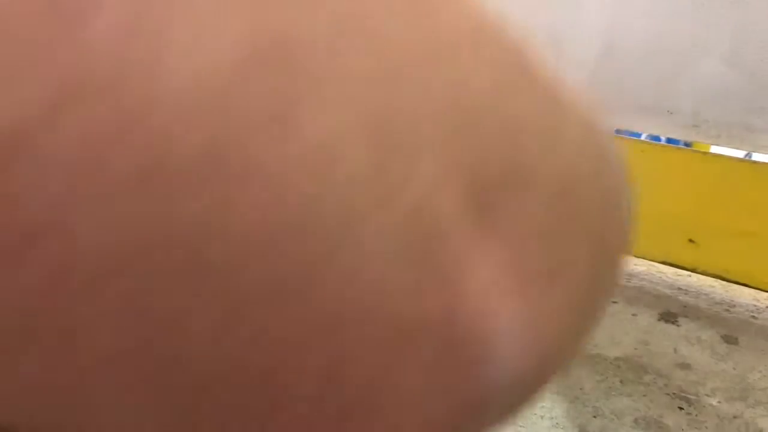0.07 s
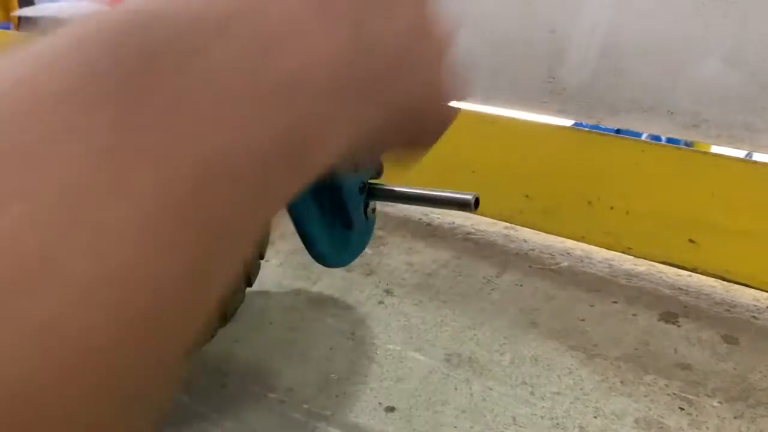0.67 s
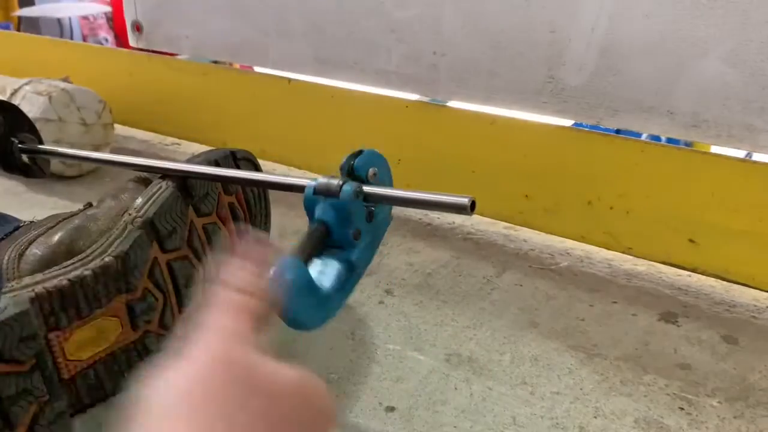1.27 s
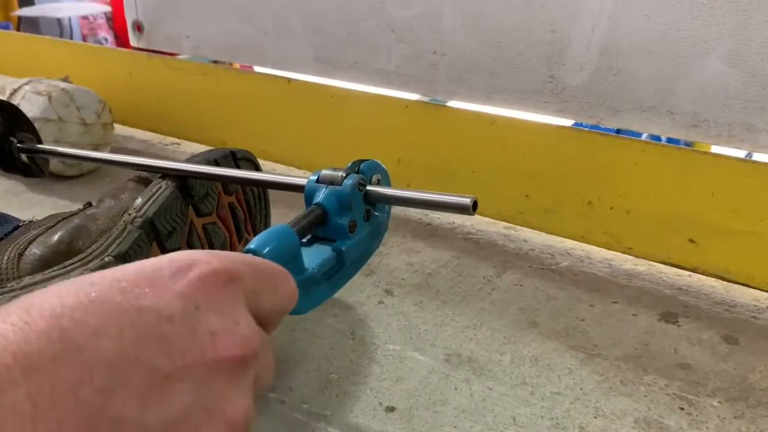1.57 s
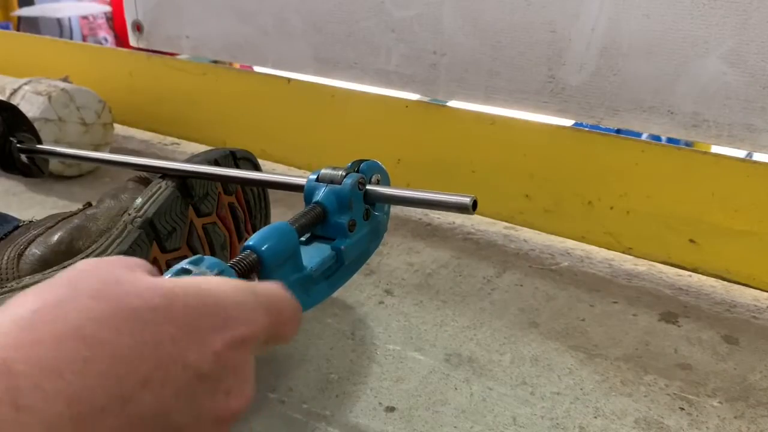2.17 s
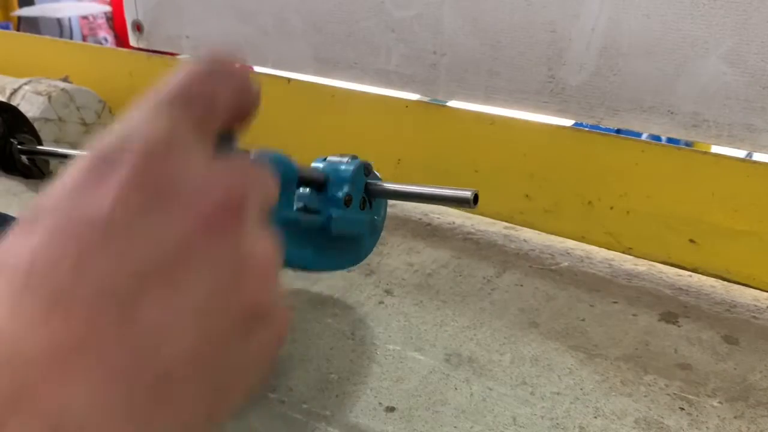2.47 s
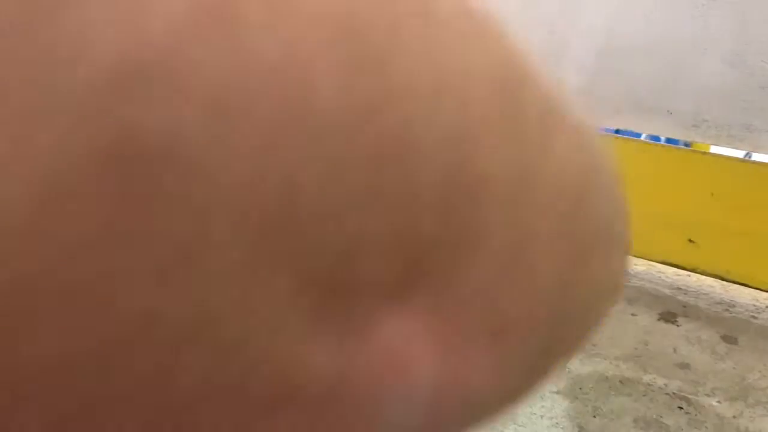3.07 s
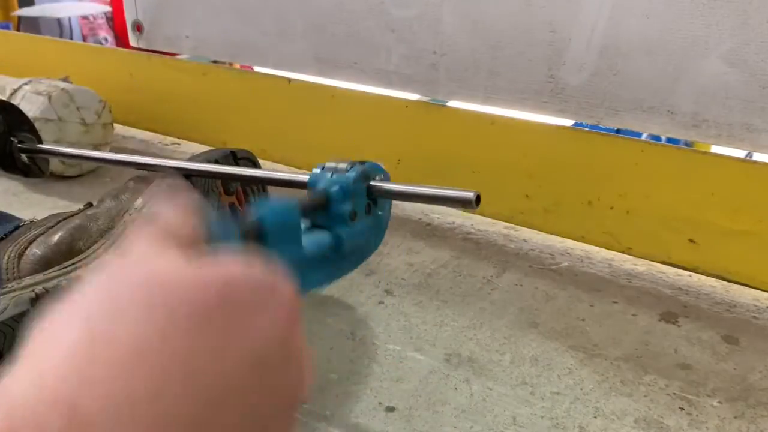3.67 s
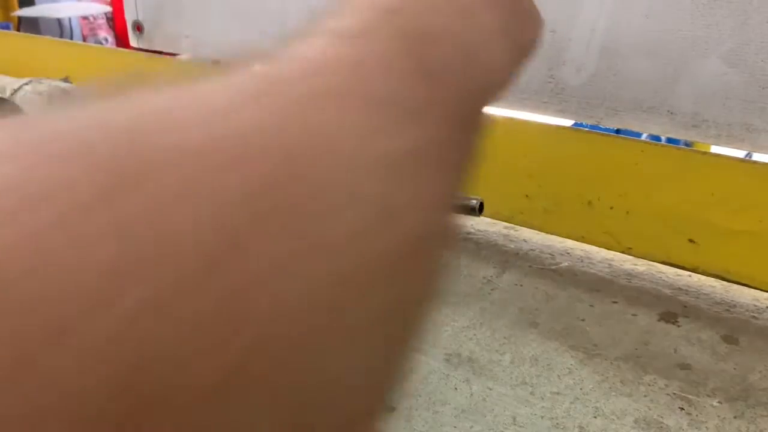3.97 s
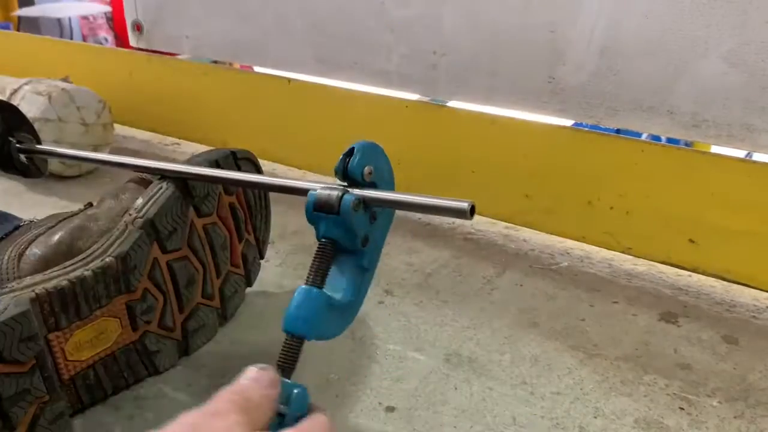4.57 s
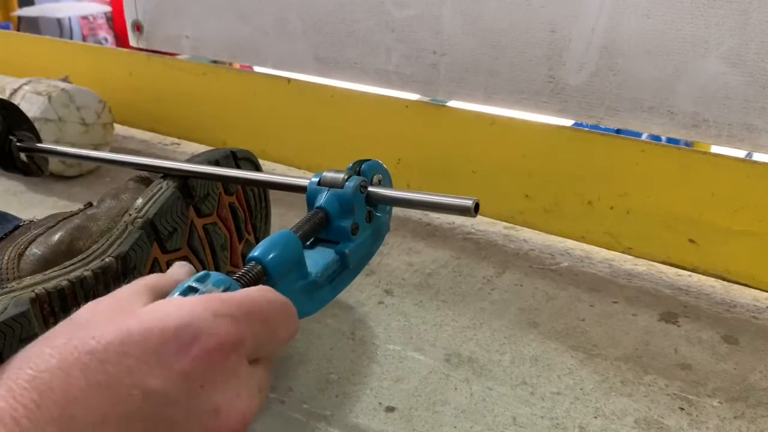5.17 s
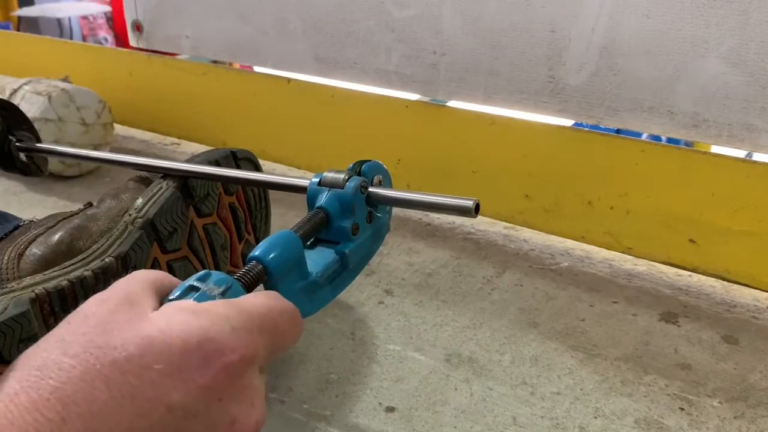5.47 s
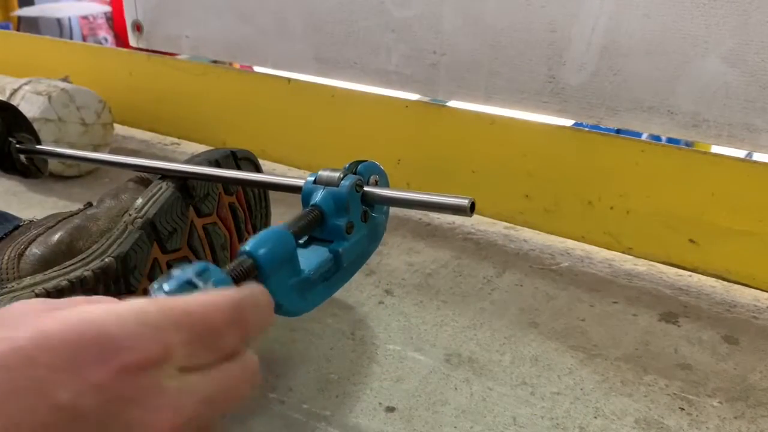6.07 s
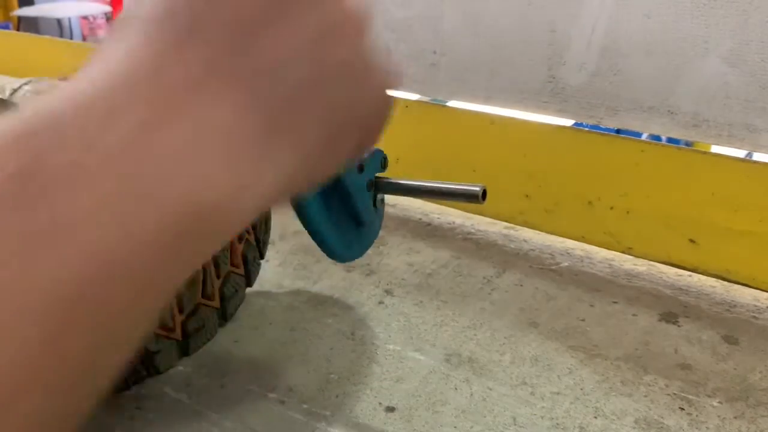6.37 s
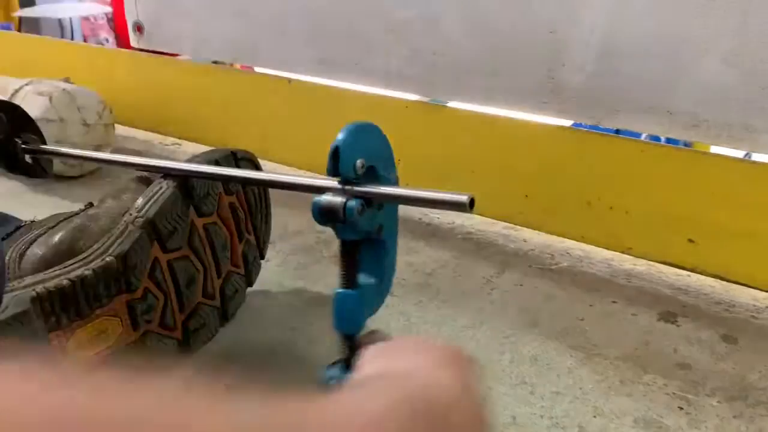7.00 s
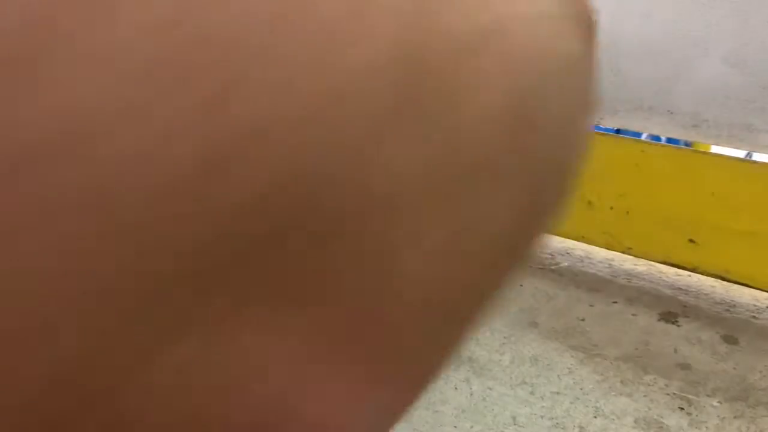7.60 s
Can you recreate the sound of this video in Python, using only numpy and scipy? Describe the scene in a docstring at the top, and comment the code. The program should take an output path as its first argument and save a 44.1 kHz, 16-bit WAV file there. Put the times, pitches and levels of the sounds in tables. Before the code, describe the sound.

A hand tube cutter ticks faintly and rattles once around a steel tube, under a constant machinery drone with a thin whine.

```python
"""Ventilation rumbles through a workshop, under a mains buzz and a wavering machine whine.
Close by, a hand tube cutter is swung round a steel tube: its wheel rubs faintly and ticks,
and one loose jolt rattles tool and tube. A boot creaks on the floor; later come two high squeaks.
Further off, a damped body gives a dull knock.
All is heard through a close two-port microphone, with small delays between left and right."""
import sys
import numpy as np
from scipy import signal
from scipy.fft import rfft, irfft
from scipy.io import wavfile
from scipy.ndimage import uniform_filter1d

SR = 44100
rng = np.random.default_rng(int(sys.argv[2]) if len(sys.argv) > 2 else 0)


def unload_audio(sound):
    """Save the sound as a 16-bit wav file, at the path given as the first command line argument."""
    columns = np.transpose(np.atleast_2d(sound))
    # keep every value between -1 and 1, then stretch to whole-number steps
    steps = np.round(np.clip(columns, -1, 1) * 32767)
    wavfile.write(sys.argv[1], SR, steps.astype(np.int16))


N = 345744
MAINS_HZ = 59.995


def undb(db):
    """Decibels to gain."""
    return 10 ** (np.asarray(db) / 20)


def clock():
    """Time of every sample, in seconds."""
    return np.arange(N) / SR


def fader(table, column=1):
    """Ride a gain along one dB column of a timed curve, scaled to rms 1."""
    rows = np.array(table)
    gain = undb(np.interp(clock(), rows[:, 0], rows[:, column]))
    return gain / np.sqrt(np.mean(gain ** 2))


def bump(s, half_s):
    """A smooth rise and fall around a time, peak 1."""
    return np.exp(-((clock() - s) / half_s) ** 2 / 2)


def bins():
    """Frequency of every spectral bin, at least 1 Hz."""
    return np.maximum(np.arange(N // 2 + 1) * SR / N, 1)


def colour(x, points):
    """EQ a sound by an outline of f/Hz, gain/dB."""
    hz, db = np.transpose(points)
    return irfft(rfft(x) * undb(np.interp(np.log(bins()), np.log(hz), db)), N)


def noise(points):
    """Noise with a spectrum of f/Hz, level/dB in a 1 Hz band."""
    return colour(rng.standard_normal(N), points) * np.sqrt(SR / 2)


def resonance(hz, width_hz):
    """A resonance stirred by turbulence, rms 1."""
    y = irfft(rfft(rng.standard_normal(N)) / (1 + 1j * (bins() - hz) / width_hz) ** 2, N)
    return y / y.std()


def walk(span_s):
    """A random wander of spread 1 that changes over span_s."""
    y = uniform_filter1d(rng.standard_normal(N), max(int(span_s * SR), 1), mode="wrap")
    return y / y.std()


def even(x, span_s):
    """Level out a noise's slow swings, leaving flutter faster than span_s."""
    power = np.abs(signal.hilbert(x)) ** 2 / 2
    size = int(span_s * SR)
    return x * x.std() / np.sqrt(uniform_filter1d(uniform_filter1d(power, size), size) + 1e-18)


def ports(x, lag=0):
    """A sound reaching the left port lag samples after the right."""
    return np.array([np.roll(x, lag), x])


def add(track, s, sound, db):
    """Lay a sound into a track at a time and a peak level."""
    i = int(s * SR)
    part = sound[:N - i] * undb(db) / np.abs(sound).max()
    track[i:i + len(part)] += part


def burst(t60):
    """A puff of noise that dies by 60 dB in t60 seconds."""
    t = clock()[:SR // 2]
    return rng.standard_normal(len(t)) * np.exp(-np.log(1000) * t / t60)


def ring(modes):
    """A body's modes dying away after one blow."""
    t = clock()[:SR // 2]
    return sum(undb(db) * np.sin(2 * np.pi * hz * t) * np.exp(-np.log(1000) * t / t60)
               for hz, db, t60 in modes)


def room(x, wet_db, t60=0.28):
    """Diffuse tail from the workshop walls, different at each port."""
    tails = [burst(t60) for _ in range(2)]
    return undb(wet_db) * np.array([signal.fftconvolve(x, h / np.linalg.norm(h))[:N] for h in tails])


def ventilation(split_hz=90, throb_s=0.56, surge_depth=1.8, mains_db=-45, hum_db=-48.5, left_db=-2):
    """Duct rumble that throbs at random and surges slowly, with motor hum."""
    # spectrum of the ducts: f/Hz, level/dB
    duct_spectrum = [(14, -85), (24, -86), (29, -59), (32, -65), (40, -65.5), (57, -47.5), (70, -52),
                     (85, -60.5), (100, -61), (133, -66), (168, -63), (205, -72.5), (250, -73.5),
                     (325, -88.5), (400, -85.5), (2000, -140)]
    # surges of the low boom: t/s, relative level/dB
    boom_ride = [(0.0, -34.5), (0.12, -35), (0.24, -40.5), (0.36, -34.5), (0.68, -34), (1.0, -37.5),
                 (1.68, -34), (2.0, -41), (2.2, -36.5), (4.24, -35.5), (4.36, -37.5), (4.66, -36.5),
                 (4.8, -33), (5.0, -34), (5.16, -37.5), (5.36, -32.5), (5.64, -37), (6.08, -35),
                 (6.68, -36.5), (6.9, -37.5), (7.02, -36.5), (7.2, -34.5), (7.36, -37.5), (7.6, -34),
                 (7.84, -39.5)]
    # drift of the drone above the boom: t/s, relative level/dB
    drone_ride = [(0, -40.5), (.52, -41.5), (1.3, -40.5), (1.6, -39.5), (3.05, -40), (3.24, -39),
                  (4.4, -42), (4.76, -41.5), (5.7, -39.5), (6.3, -40), (7.0, -40), (7.84, -40.5)]
    rumble = noise(duct_spectrum)
    boom = irfft(rfft(rumble) / (1 + (bins() / split_hz) ** 12), N)
    bed = even(boom, throb_s) * fader(boom_ride) ** surge_depth
    bed += even(rumble - boom, throb_s) * fader(drone_ride)
    phase = 2 * np.pi * MAINS_HZ * clock()
    hum = np.sqrt(2) * np.sin(2 * phase) + 0.42 * resonance(2 * MAINS_HZ, width_hz=3.8)
    bed += undb(mains_db) * np.sin(phase) + undb(hum_db) * hum
    return bed * undb([[left_db / 2], [-left_db / 2]])


def vent_air():
    """Air rushes from the vents on all sides, with a hiss from the left of the room."""
    # wide rush: f/Hz, level/dB
    rush = [(25, -101), (60, -64.5), (110, -72), (170, -81), (300, -84.5), (550, -92), (700, -89.5),
            (900, -91.5), (1900, -96), (3600, -94.5), (6300, -98), (7600, -103), (9500, -114),
            (15000, -135)]
    # one-sided hiss: f/Hz, level/dB
    side_hiss = [(200, -115), (500, -104.5), (900, -99.5), (4000, -100), (6300, -102), (9000, -140)]
    return np.array([noise(rush), noise(rush)]) + ports(noise(side_hiss), lag=-20)


def motor(lower_db=-67, upper_db=-70, upper_hz=477.6, depth=0.56, left_db=4):
    """A mains harmonic and a rougher motor tone, fading as the paths through the room change."""
    # fades of the two tones: t/s, lower relative level/dB, upper relative level/dB
    fades = [(0.0, -72, -74), (.7, -70, -79), (1.2, -63, -84), (1.92, -58.5, -81), (2.45, -74, -80),
             (2.64, -64.5, -60), (3.8, -76.5, -94), (4.27, -67, -70), (4.6, -104, -70), (4.9, -68, -69),
             (5.25, -74, -62), (5.72, -111, -94), (6.05, -55, -97), (6.28, -79, -73), (6.55, -60, -80),
             (6.8, -80, -74), (7.2, -53.5, -68), (7.84, -70, -79)]
    lower = np.sqrt(2) * np.sin(2 * np.pi * 7 * MAINS_HZ * clock())
    upper = even(resonance(upper_hz, width_hz=1.74), span_s=0.38)
    tones = undb(lower_db) * lower * fader(fades, column=1) ** depth
    tones += undb(upper_db) * upper * fader(fades, column=2) ** depth
    return tones * undb([[left_db / 2], [-left_db / 2]])


def mains_buzz(waver=0.5, waver_hz=1.65):
    """Mains harmonics; each wavers as the moving arm changes its paths through the room."""
    # partials of the buzz: multiple of the mains frequency, mid level/dB, side level/dB
    harmonics = [(10, -79, -74), (11, -86, -86), (12, -77.5, -77), (13, -86, -86), (22, -93, -83),
                 (24, -81, -86), (26, -79, -88), (28, -88, -84), (29, -86, -83), (31, -89, -82),
                 (33, -85, -77), (36, -99, -84), (47, -84, -86), (76, -86, -88), (88, -89, -95),
                 (92, -96, -84), (94, -88, -92), (98, -88, -88), (100, -88, -86), (104, -86, -95),
                 (106, -86, -92), (108, -89, -94)]
    buzz, t = np.zeros((2, N)), clock()
    knots = np.arange(0, t[-1] + 1, 1 / waver_hz)
    for multiple, mid_db, side_db in harmonics:
        phase = 2 * np.pi * multiple * MAINS_HZ * t
        for db, polarity in ((mid_db, [[1], [1]]), (side_db, [[1], [-1]])):
            drift = 1 + waver * np.interp(t, knots, rng.standard_normal(64)[:len(knots)])
            tone = np.sqrt(2) * np.sin(phase + rng.uniform(0, 2 * np.pi))
            buzz += np.array(polarity) * undb(db) * drift * tone
    return buzz


def whine(hz=1618, wander_hz=4, steady_db=-75.5, fade_s=0.022, rough_hz=1614, rough_db=-68, patchy_db=2):
    """A machine resonance sings in held swells on a wavering pitch; rougher ones flare with the load."""
    # swells of the singing tone: start/s, length/s, level/dB
    swells = [(0.037, .12, -67.5), (0.326, .08, -67), (0.413, .13, -61), (.78, 0.074, -65),
              (1.26, 0.074, -64), (1.583, 0.12, -62), (2.068, .13, -65), (2.29, .11, -66),
              (2.552, 0.068, -65), (2.676, .11, -62), (3.528, .05, -64), (4.19, 0.12, -61.5),
              (4.46, .13, -64), (4.7, 0.21, -64.5), (5.115, .07, -66), (5.31, .14, -61.5),
              (5.487, .16, -69), (5.71, 0.077, -60), (6.048, .1, -65), (6.487, 0.065, -65),
              (6.7, 0.12, -62), (6.852, 0.086, -62.5), (7.05, 0.042, -64), (7.53, 0.15, -65),
              (7.68, 0.096, -65)]
    # the machine works harder: t/s, strength/dB, half length/s
    load_peaks = [(.93, -11, 0.026), (4.74, 6, 0.11), (5.77, 12, 0.08), (6.54, 4, 0.067)]
    # rough resonances: f/Hz, width/Hz, resting level/dB, response to load (0-1)
    bands = [(1433, 8.7, -75, 0.6), (2810, 22, -71, 0.44), (3260, 83, -71, 0.1), (4375, 47, -71.5, 0.45),
             (6400, 120, -83, 1)]
    t = clock()
    load = 1 + sum(undb(db) * bump(s, half_s) for s, db, half_s in load_peaks)
    held = np.full(N, undb(steady_db))
    for s, length, db in swells:
        gate = np.clip(0.5 + np.minimum(t - s, s + length - t) / fade_s, 0, 1)
        held = np.maximum(held, undb(db) * gate)
    phase = 2 * np.pi * np.cumsum(hz + wander_hz * walk(span_s=0.061)) / SR
    sides = []
    for tone in ports(np.sqrt(2) * held * np.sin(phase), lag=5):
        flares = sum(undb(db) * resonance(f, width) * load ** response * undb(patchy_db * walk(0.18))
                     for f, width, db, response in bands)
        sides.append(tone + undb(rough_db) * resonance(rough_hz, width_hz=28) + flares)
    return np.array(sides)


def knock():
    """A dry blow on a well damped body, with one softer bounce."""
    # blow and bounce: t/s, peak/dB, low-pass cutoff/Hz
    blows = [(6.2766, -33, 2000), (6.2803, -35, 680)]
    # modes of the damped body: f/Hz, relative level/dB, t60/s
    modes = [(634, 2, 0.027), (740, 1, 0.012), (1060, 10, 0.019)]
    thud = np.zeros(N)
    for s, db, cutoff_hz in blows:
        soften = signal.butter(4, cutoff_hz, fs=SR, output="sos")
        add(thud, s, signal.sosfilt(soften, ring(modes)), db)
    return thud


def scuffs():
    """Light scuffs as the hand shifts and after the knock."""
    # brushing contacts: t/s, peak before EQ/dB, t60/s
    touches = [(1.42, -56, .4), (6.289, -43, 0.11), (6.331, -42, 0.081), (6.371, -46, 0.14),
               (7.369, -51.5, 0.63)]
    # midrange colour of a scuff: f/Hz, gain/dB
    scuff_eq = [(300, -18), (700, 13), (1600, 8), (3000, 5), (7000, -25)]
    track = np.zeros(N)
    for s, db, t60 in touches:
        add(track, s, burst(t60), db)
    return colour(track, scuff_eq)


def creak_and_squeaks():
    """A boot creaks low on the floor; later come two brief, rough, high squeaks."""
    # the creak, then the squeaks: t/s, f/Hz, width/Hz, level/dB, half length/s
    cues = [(1.432, 643, 45, -65.5, 0.11), (4.555, 4460, 90, -62, 0.033), (4.592, 2730, 90, -67, 0.13)]
    return sum(undb(db) * resonance(hz, width) * bump(s, half_s) for s, hz, width, db, half_s in cues)


def fine_hiss():
    """A thin, steady hiss from the direction of the tool."""
    # airy top end: f/Hz, level/dB
    spectrum = [(4000, -135), (7000, -108), (8200, -101), (9500, -108.5), (10700, -112), (11800, -121),
                (13500, -120), (15500, -135)]
    return noise(spectrum)


def rubbing(grit_db=2.5, grit_s=0.0019, catch_db=3, catch_s=0.013, resting_db=-16):
    """A faint gritty hiss that catches and slips as the wheel is dragged round the tube."""
    # strokes of the wheel: t/s, relative level/dB, half length/s
    strokes = [(0.252, 0, 0.032), (.48, -7, .03), (1.12, -7, .015), (1.43, -4, .02), (2.224, -4, 0.041),
               (3.64, 7, .02), (3.83, 2, 0.028), (3.944, 2, .016), (4.58, -2, .07), (5.95, -1, .035),
               (6.34, 1, .026), (6.72, -2, .025), (7.062, 0, .02), (7.17, 10, .016), (7.212, 4, .012),
               (7.4, 6, 0.03)]
    # spectrum of the friction: f/Hz, level/dB
    friction = [(5000, -135), (9000, -112), (11000, -109), (13500, -110), (15500, -128)]
    pressure = undb(resting_db) + sum(undb(db) * bump(s, half_s) for s, db, half_s in strokes)
    grain = undb(grit_db * walk(grit_s) + catch_db * walk(catch_s))
    return noise(friction) * pressure * grain / np.sqrt(np.mean(grain ** 2))


def cutter(grit=0.13, edge_db=3):
    """The wheel ticks and a loose jolt rattles tool and tube; gives ringing body and bright edge."""
    # hits of the rattle: t/s, body peak/dB, edge peak before EQ/dB, contact time/s
    rattle = [(3.294, -60, -40, 0.003), (3.31, -52, -44, 0.002), (3.313, -38.5, -45, 0.0098),
              (3.3222, -34.5, -44, 0.004), (3.3265, -38, -50, 0.003), (3.3429, -34, -33.5, 0.0069),
              (3.344, -37, -56, 0.0034), (3.359, -33, -38, 0.0033), (3.3608, -30.5, -38, 0.0051),
              (3.368, -35.5, -40.5, 0.0056), (3.3740, -38, -42, 0.005), (3.3790, -39, -40, 0.006)]
    # modes of cutter and tube: f/Hz, relative level/dB, t60/s
    modes = [(437, -2, 0.049), (510, 9, 0.034), (650, 11.5, 0.014), (900, -1, .012), (1070, -7, .018),
             (1290, 8.5, 0.024), (1420, 6, 0.021), (1580, -1, 0.022), (2110, 3.5, 0.021), (2730, -1, 0.025),
             (2950, -3, 0.03)]
    # ticks of the wheel: t/s, peak before EQ/dB, t60/s
    ticks = [(.8672, -37.5, 0.012), (2.437, -49, .04), (3.9328, -48, .02), (4.1775, -32.5, 0.015),
             (4.277, -39.5, 0.025), (4.8208, -50, 0.03), (7.3867, -38, .014)]
    # bright colour of steel contact: f/Hz, gain/dB
    steel_eq = [(1500, -22), (5000, -2), (7000, -2.5), (9200, -5.5), (10400, -2.5), (11500, -6),
                (13300, -4), (14800, -16), (16000, -18)]
    body, edge = np.zeros(N), np.zeros(N)
    for s, body_db, bright_db, contact_s in rattle:
        push = grit * burst(2 * contact_s)
        push[0] += 1  # a hard attack ahead of the scrape
        add(body, s, signal.fftconvolve(push, ring(modes)), body_db)
        add(edge, s, burst(5 * contact_s), bright_db)
    for s, db, t60 in ticks:
        add(edge, s, burst(t60), db)
    return body, colour(edge, steel_eq) * undb(edge_db)


def scene():
    """A bed of machinery, the tool close and nearly dry, the knock and scuffs deeper in the room."""
    body, edge = cutter()
    thud = knock() + scuffs()
    treble = edge + rubbing() + fine_hiss()
    close = ports(body + creak_and_squeaks()) + ports(treble, lag=13)
    close += room(body, wet_db=-10) + room(edge, wet_db=-16)
    far = ports(thud) + room(thud, wet_db=-5)
    return ventilation() + vent_air() + motor() + mains_buzz() + whine() + close + far


def record(dry):
    """A steep low-pass cuts the top above 15.7 kHz."""
    return signal.sosfilt(signal.ellip(10, 0.2, 80, 15700, fs=SR, output="sos"), dry)


dry = scene()
out = record(dry)
unload_audio(out)
```